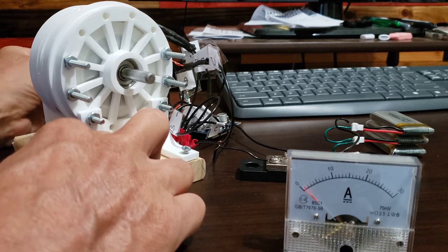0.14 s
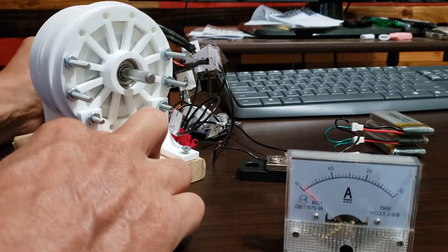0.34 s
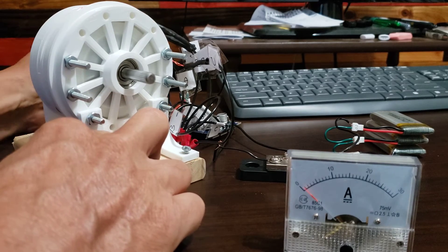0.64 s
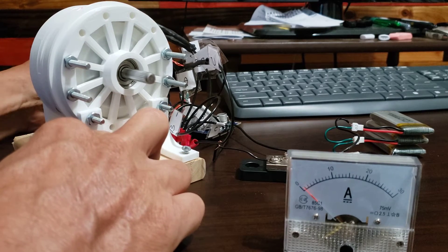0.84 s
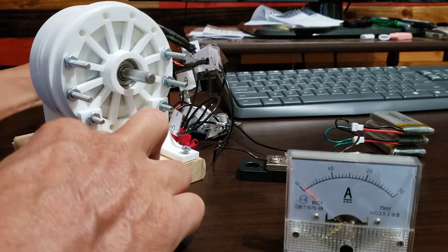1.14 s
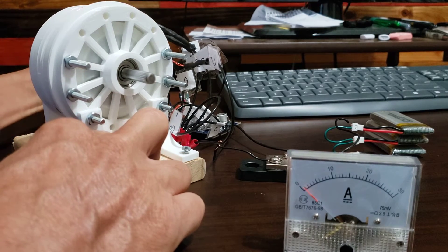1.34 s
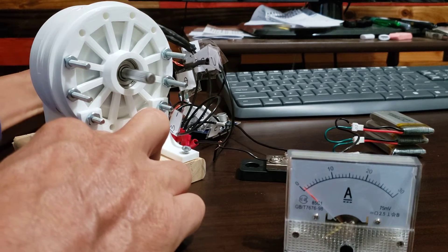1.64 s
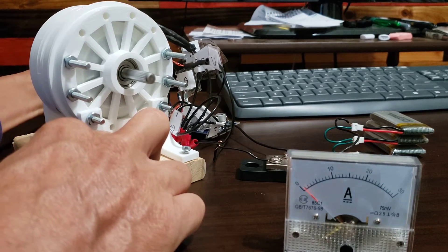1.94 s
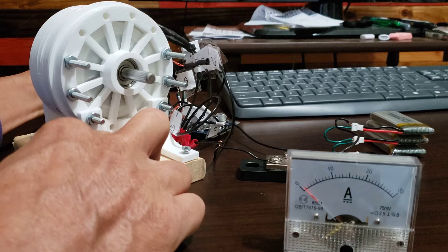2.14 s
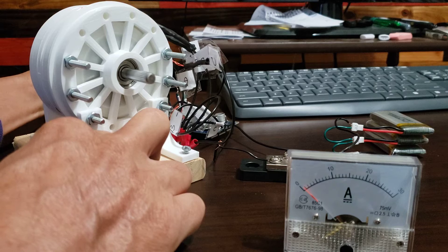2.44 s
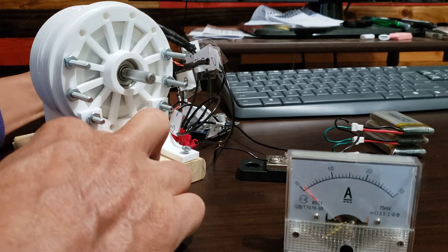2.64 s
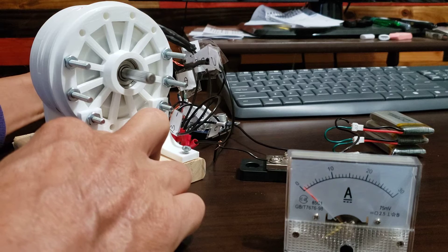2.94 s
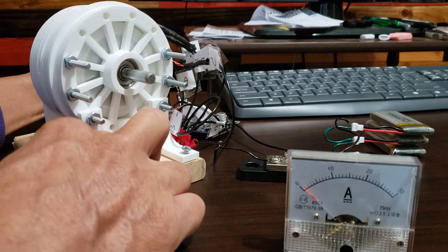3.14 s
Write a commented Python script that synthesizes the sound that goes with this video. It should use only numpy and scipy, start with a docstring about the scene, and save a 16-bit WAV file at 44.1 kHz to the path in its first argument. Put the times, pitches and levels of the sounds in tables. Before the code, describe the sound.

Steady electric motor whine near two kilohertz, with buzzing hum, airy hiss and flickering bearing ticks

```python
"""Small electric motor on a bench

A motor runs at near-steady speed close to a two-port microphone that shifts in the first half second.
The shaft hums on its orders and the poles whine on the 24th and 48th; the loose bearing chirps and
knocks at its own angle of each turn, both swelling in spells over a weaker rest level.
Air and bearing hiss, a few low bench resonances and a narrow high ring are shaped noise underneath."""
import sys
import numpy as np
from scipy import signal
from scipy.fft import rfft, irfft
from scipy.io import wavfile

SR = 44100
rng = np.random.default_rng(int(sys.argv[2]) if len(sys.argv) > 2 else 0)


def digitize_waveform(pressure):
    """Quantize a signal to 16-bit integers and store it at the path in sys.argv[1].

    Rows of a 2-D input are taken as channels; values are limited to [-1, 1].
    """
    field = np.atleast_2d(pressure).T
    bounded = np.clip(field, -1, 1)
    quanta = np.round(bounded * 32767).astype(np.int16)
    wavfile.write(sys.argv[1], SR, quanta)


N = 145530

# Shaft speed. Each row: time in seconds, turns per second.
SPEED = [(0.0, 85.608), (0.5, 85.63), (1.0, 85.659), (1.6, 85.656), (2.2, 85.599), (2.8, 85.584),
         (3.3, 85.492)]
# Level change at first, before the microphone settles. Each row: frequency in Hz, change in dB.
START = [(80, 0.5), (440, -11.5), (780, -3), (1500, -7), (14000, -4)]
SETTLE_S = 0.52
WAVER_DB, WAVER_HZ = 2.1, 9


def amp(db):
    """Amplitude ratio of a level in dB."""
    return 10 ** (np.asarray(db) / 20)


def evened(x):
    """Scale to rms 1."""
    return x / np.sqrt(np.mean(x ** 2) + 1e-20)


def along(s, value):
    """Straight lines through values at given seconds, one value per sample."""
    return np.interp(np.arange(N) / SR, s, value)


def band(x, hz, width_hz):
    """Bell-shaped band of a sound, at half amplitude width_hz / 2 either side of hz."""
    f = np.fft.rfftfreq(x.shape[-1], 1 / SR)
    return irfft(rfft(x) / (1 + (2 * (f - hz) / width_hz) ** 2), x.shape[-1])


def slow(hz):
    """Slow random drift of rms 1: noise rolled off above hz."""
    return evened(band(rng.standard_normal(N), 0, 2 * hz))


def tone(turns, left_db, right_db, lead_rad):
    """One partial at both ports, rms levels, random start phase; the left leads."""
    angle = 2 * np.pi * (turns + rng.random())
    left = amp(left_db) * np.cos(angle + lead_rad)
    right = amp(right_db) * np.cos(angle)
    return np.sqrt(2) * np.array([left, right])


def settle(hz):
    """Gain of a partial over time, from its START level to 1 as the microphone settles."""
    at_hz, db = np.transpose(START)
    start = amp(np.interp(np.log(hz), np.log(at_hz), db))
    return start + (1 - start) * along([0, SETTLE_S], [0, 1])


def hum(turns):
    """Wavering shaft orders over a faint comb that repeats every turn, plus a low bench tone."""
    # Settled low orders. Each row: multiple, left in dB, right in dB, left lead in rad.
    low_orders = [(1, -46.5, -55, 0.6), (2, -49, -50, 0.46), (3, -47, -48.5, 0), (4, -55, -60, 0.5),
                  (5, -47.5, -50.5, 0), (6, -47, -48, -0.42), (7, -47, -57, -2.3), (8, -44.5, -85, 2.5),
                  (9, -67.5, -45.5, 2.5), (11, -60.5, -59.5, -0.1), (12, -53.5, -55.5, -1.1)]
    # Multiples of shaft speed, one for each row of high_orders.
    high_multiples = [17, 32, 36, 30, 60, 64, 68, 72]
    # Settled high orders. Each row: left in dB, right in dB.
    high_orders = [(-64, -55.5), (-51.5, -53), (-52, -63), (-61, -66), (-68, -52.5), (-68, -52.5),
                   (-62, -76), (-50, -78)]
    # Growth of some orders, 0 dB at mid-scene. Key: multiple; value: dB per second.
    drift = {5: 1.2, 6: 0.85, 8: -1}
    high_lead_rad = -2.37
    rows = list(low_orders)
    rows += [(k, *row, high_lead_rad) for k, row in zip(high_multiples, high_orders)]
    waver = amp(WAVER_DB * slow(WAVER_HZ))
    t = (np.arange(N) - N / 2) / SR
    orders = np.zeros((2, N))
    for k, left_db, right_db, lead_rad in rows:
        partial = tone(round(k) * turns, left_db, right_db, lead_rad)
        partial *= np.roll(waver, rng.integers(N))
        partial *= settle(k * SPEED[0][1])
        orders += partial * amp(drift.get(round(k), 0) * t)

    # comb: uneven, every fourth order stronger, falling 6 dB per 130 orders
    comb, size = np.arange(13, 131), 8192
    db = -70 + 5 * (comb % 4 == 0) - 6 * comb / comb[-1]
    db = db + 4.5 * rng.standard_normal((2, len(comb)))
    lines = amp(db) * np.exp(2j * np.pi * rng.random(db.shape))
    lines = np.pad(lines, ((0, 0), (comb[0], 0)))
    one_turn = irfft(lines, size) * size / np.sqrt(2)
    repeated = one_turn[:, (turns % 1 * size).astype(int)]

    bench_hz, bench_db, bench_waver_db = 55.5, -53.5, 4.5
    bench = tone(bench_hz * t, bench_db, bench_db, 0) * amp(bench_waver_db * slow(WAVER_HZ / 2))
    return orders + repeated + bench


def whine(turns):
    """Pole tones on orders 24 and 48, modulated lightly by the bearing cage and by slow noise."""
    # Levels and phase as the microphone moves. Each row: time in seconds, 24th left in dB,
    # 24th right in dB, 24th left lead in rad, 48th left in dB, 48th right in dB.
    pole_path = [(0, -40, -36, 2.6, -58, -42), (.3, -37, -30.5, 3.4, -52, -38),
                 (.46, -49, -30.5, 2.2, -43.5, -48), (.55, -39, -36.5, 0.73, -42, -40),
                 (.7, -34, -44, 1.2, -41.5, -38.5), (1, -32, -42, 2.04, -43, -38),
                 (1.4, -31.5, -42, 0.73, -50, -37), (2, -31.5, -39.5, 1.4, -51, -38),
                 (3.3, -32, -39.5, 1.5, -47, -37.5)]
    lead_48_rad = -2.3
    cage_per_turn = .402
    cage_db, half_cage_db = -30, -30  # each sideband, relative to its tone
    s, *columns = np.transpose(pole_path)
    left_24, right_24, lead_24, left_48, right_48 = [along(s, c) for c in columns]
    cage = 2 * np.pi * cage_per_turn * turns
    wobble = 1 + 2 * amp(cage_db) * np.cos(cage) + 2 * amp(half_cage_db) * np.cos(cage / 2)
    wobble = wobble + 0.069 * slow(25)
    poles = tone(24 * turns, left_24, right_24, lead_24)
    poles = poles + tone(48 * turns, left_48, right_48, lead_48_rad)
    return wobble * poles


def spells(table, rest_db, spell_s):
    """Level curve (s, dB): bell-shaped swells added in amplitude to a rest level."""
    t = np.arange(0, N, 200) / SR
    swells = sum(amp(db) * np.exp(-.5 * ((t - s) / spell_s) ** 2) for s, db in table)
    return np.transpose([t, 20 * np.log10(amp(rest_db) + swells)])


def bursts(turns, turn, jitter_turns, strength, spread_db, rise_s, bands):
    """Short rings once per turn at a given shaft angle; timing, pitch, phase and size scatter."""
    at = np.flatnonzero(np.diff(np.floor(turns - turn)))
    # softly limited to +-2; two columns per burst, then four per band
    chance = 2 * np.tanh(rng.standard_normal((len(at), 2 + 4 * len(bands))) / 2)
    level_db = along(*np.transpose(strength))[at] + spread_db * chance[:, 0]
    at = np.maximum(at + chance[:, 1] * jitter_turns * SR / SPEED[0][1], 0).astype(int)
    half = 200  # samples
    t = np.arange(-half, half) / SR
    out = np.zeros((2, N + 4 * half))
    where = at[:, None] + np.arange(len(t))
    width_s = rise_s * np.where(t > 0, 2.2, 1)  # dies slower than it rises
    for k, (hz, scatter_hz, left_db, right_db) in enumerate(bands):
        pitch, phase, apart, size = chance[:, 2 + 4 * k:6 + 4 * k].T[..., None]
        angle = 2 * np.pi * (hz + scatter_hz * pitch) * t + 9 * phase
        shape = amp(level_db[:, None] + 2 * size) * np.exp(-.5 * (t / width_s) ** 2)
        np.add.at(out[0], where, amp(left_db) * shape * np.cos(angle))
        np.add.at(out[1], where, amp(right_db) * shape * np.cos(angle + 0.44 * apart))
    return out[:, half:N + half]


def chirp(turns):
    """High ring of the loose bearing, once a turn."""
    # Spells. Each row: peak in seconds, level in dB before band offset and scatter.
    chirp_spells = [(.02, -59), (.16, -50.5), (.52, -43.5), (.7, -51), (.8, -50), (.88, -47), (1, -45.5),
                    (1.13, -51), (1.38, -48.5), (1.57, -43.5), (1.69, -48), (1.78, -48), (1.92, -51),
                    (2.17, -52), (2.38, -44), (2.5, -53), (2.68, -48.5), (2.85, -50), (3.05, -42),
                    (3.17, -45.5), (3.27, -48.5)]
    # Each row: centre in Hz, scatter in Hz, left offset in dB, right offset in dB.
    chirp_bands = [(11410, 87, 7, 6.5), (11970, 180, -10, 12), (13400, 1000, 0, -5)]
    strength = spells(chirp_spells, rest_db=-51, spell_s=0.026)
    return bursts(turns, turn=.685, jitter_turns=.028, strength=strength,
                  spread_db=3.5, rise_s=.0006, bands=chirp_bands)


def knock(turns):
    """Shorter, duller ring of the loose bearing, once a turn at another angle."""
    # Spells. Each row: peak in seconds, level in dB before band offset and scatter.
    knock_spells = [(.49, -35), (.72, -37), (1.17, -38), (1.45, -34), (1.52, -33), (1.77, -40), (1.95, -45),
                    (2.22, -34), (2.45, -37), (2.57, -35), (2.71, -31.5), (2.92, -28), (3.0, -31)]
    # Each row: centre in Hz, scatter in Hz, left offset in dB, right offset in dB.
    knock_bands = [(5300, 200, -7, -5), (7050, 200, -1.5, -10)]
    strength = spells(knock_spells, rest_db=-42, spell_s=0.024)
    return bursts(turns, turn=.59, jitter_turns=.055, strength=strength,
                  spread_db=4.5, rise_s=.00022, bands=knock_bands)


def hiss():
    """Wide noise, alike at both ports in the bass, plus noise-fed resonances; START shapes the opening."""
    # Settled noise floor. Each row: frequency in Hz, left in dB per Hz, right in dB per Hz.
    floor_rows = [(44, -76, -75), (155, -75, -72), (620, -77, -76.5), (1110, -72.5, -76.5),
                  (1670, -83.5, -79.5), (1850, -75.5, -75), (3150, -76.5, -81.5), (3290, -84.5, -87),
                  (3920, -75.5, -76.5), (5440, -80.5, -78), (7750, -81, -89.5), (8840, -89.5, -84.5),
                  (10600, -80, -80.5), (11800, -80, -75), (13900, -82.5, -84), (15700, -84, -90)]
    # Left-right likeness. Each row: frequency in Hz, likeness from 0 to 1, left lead in rad.
    likeness_rows = [(283, 1, 0.17), (1220, 0.67, -1.56), (2970, 0.33, -2), (5200, 0.86, -4.5),
                     (8000, 0.63, -4.5)]
    # Bench resonances. Each row: centre in Hz, width in Hz, left in dB, right in dB.
    bench_rings = [(57.3, 16, -54.5, -61), (122, 5.7, -52.5, -53), (237, 10.4, -57, -56),
                   (414, 11, -64.5, -59.5)]
    # Narrow high ring: width in Hz, left in dB, right in dB.
    high_ring = (45, -54, -59)
    high_ring_hz = 10700
    f = np.fft.rfftfreq(N, 1 / SR) + 1  # offset keeps the log finite
    log_f = np.log(f)

    at_hz, same, lead_rad = np.transpose(likeness_rows)
    same = np.clip(np.interp(log_f, np.log(at_hz), same), 0, 1)
    lag = np.exp(-1j * np.interp(log_f, np.log(at_hz), lead_rad))
    left, other = rfft(rng.standard_normal((2, N)))
    right = same * left * lag + np.sqrt(1 - same ** 2) * other

    hz, left_db, right_db = np.transpose(floor_rows)
    gain = amp([np.interp(log_f, np.log(hz), db) for db in (left_db, right_db)])
    gain = gain * np.sqrt(SR / 2) / (1 + (35 / f) ** 4)  # low cut at 35 Hz
    for hz, width_hz, l_db, r_db in list(bench_rings) + [(high_ring_hz, *high_ring)]:
        bell = np.sqrt(2 * SR / np.pi / width_hz) / (1 + (2 * (f - hz) / width_hz) ** 2)
        gain += amp([[l_db], [r_db]]) * bell

    spectrum = gain * np.array([left, right])
    at_hz, db = np.transpose(START)
    steady = irfft(spectrum, N)
    start = irfft(spectrum * amp(np.interp(log_f, np.log(at_hz), db)), N)
    return start + (steady - start) * along([0, SETTLE_S], [0, 1])


def scene():
    """All sources, the rotating ones locked to one shaft angle."""
    turns = np.cumsum(along(*np.transpose(SPEED))) / SR
    return hum(turns) + whine(turns) + chirp(turns) + knock(turns) + hiss()


def record(dry):
    """Band limit: linear-phase low-pass at 15.8 kHz."""
    edge_hz = 15800
    lowpass = signal.firwin(1023, edge_hz, window=("kaiser", 9), fs=SR)
    return signal.oaconvolve(dry, lowpass[None], "same")


dry = scene()
out = record(dry)
digitize_waveform(out)
```